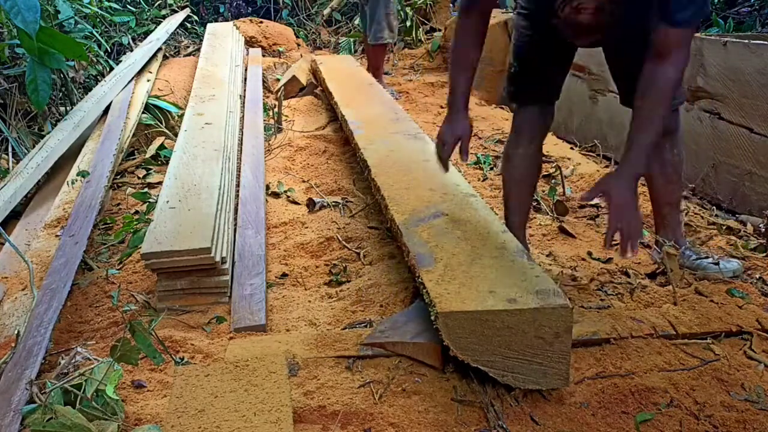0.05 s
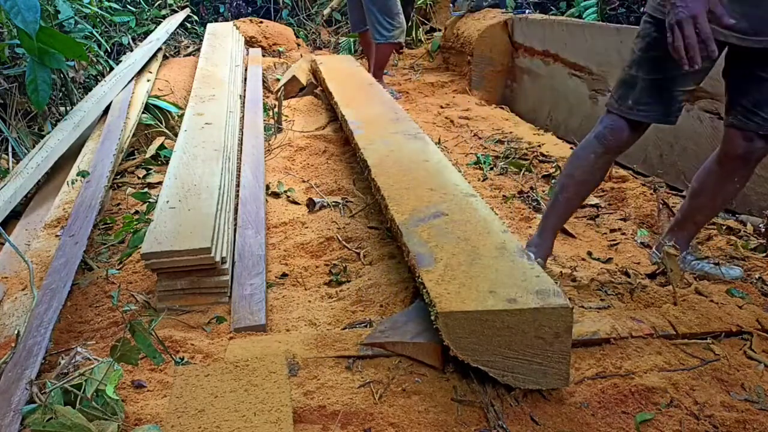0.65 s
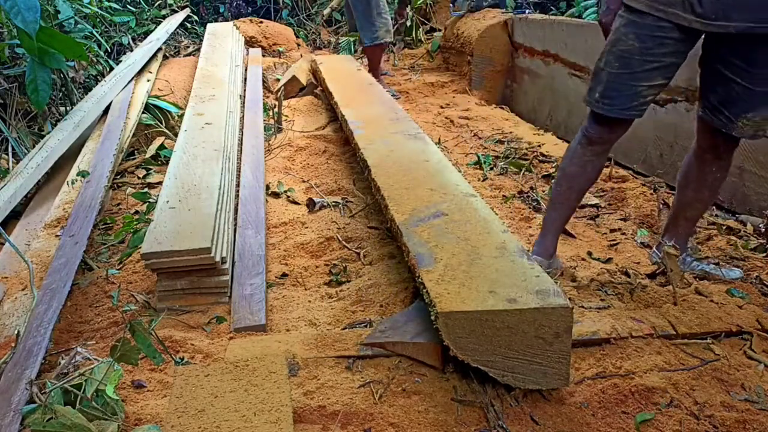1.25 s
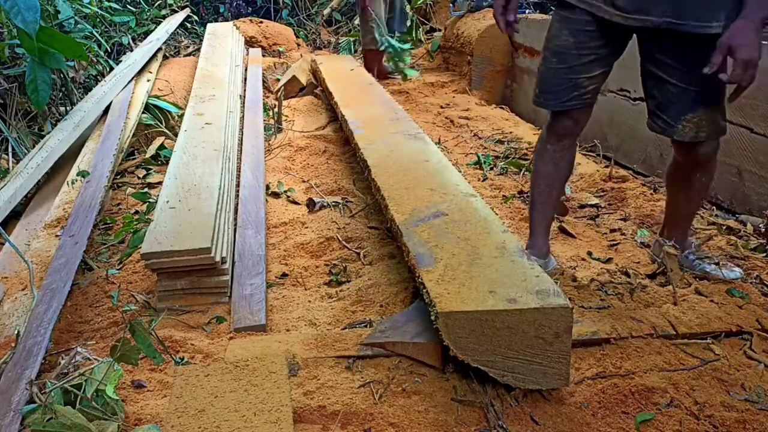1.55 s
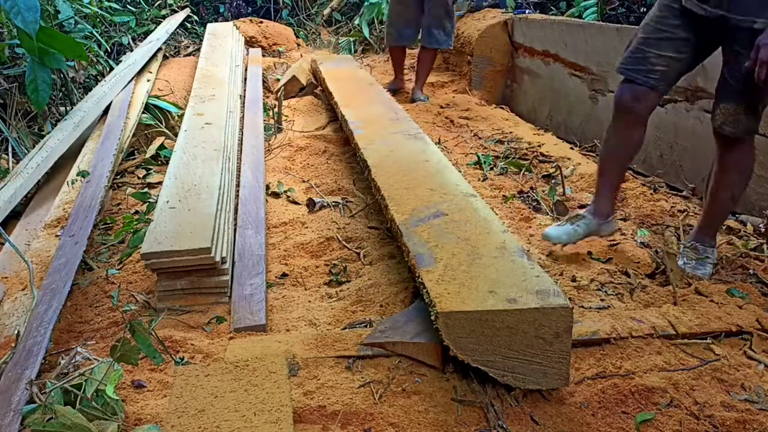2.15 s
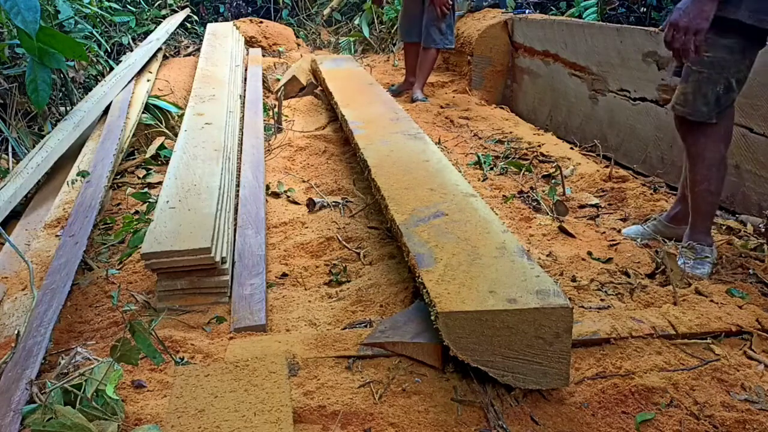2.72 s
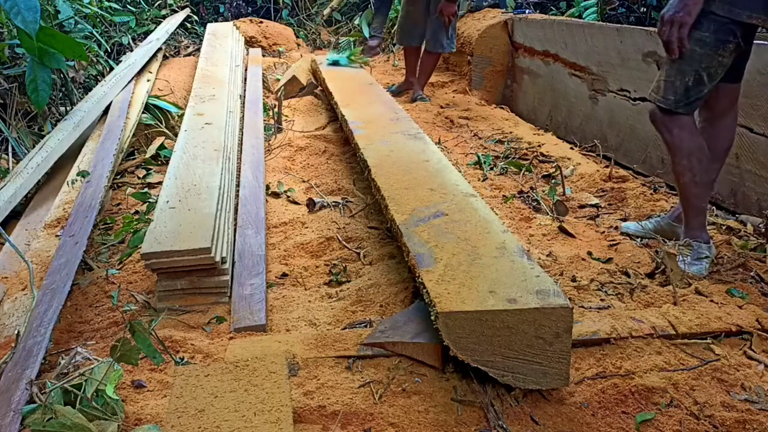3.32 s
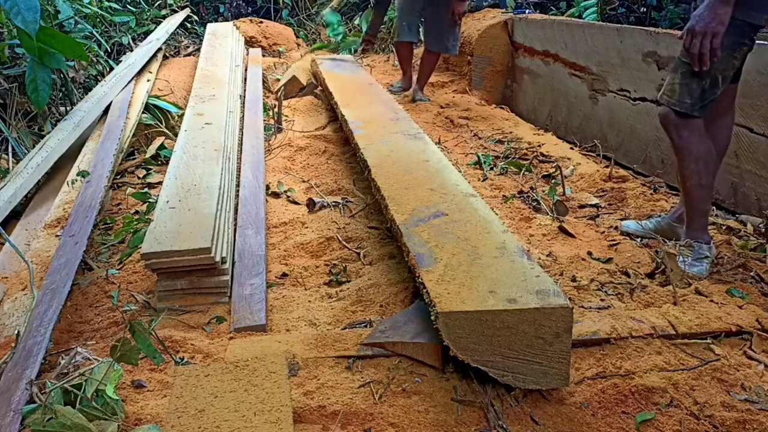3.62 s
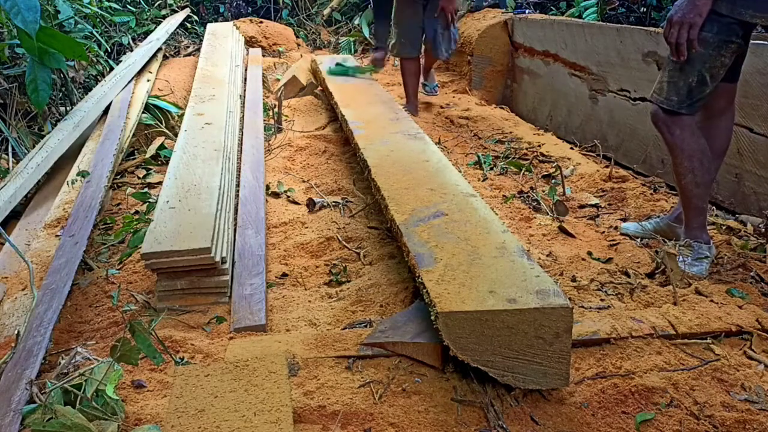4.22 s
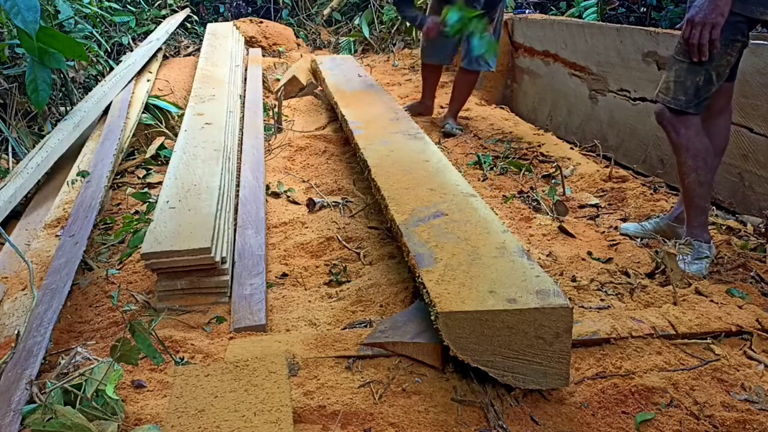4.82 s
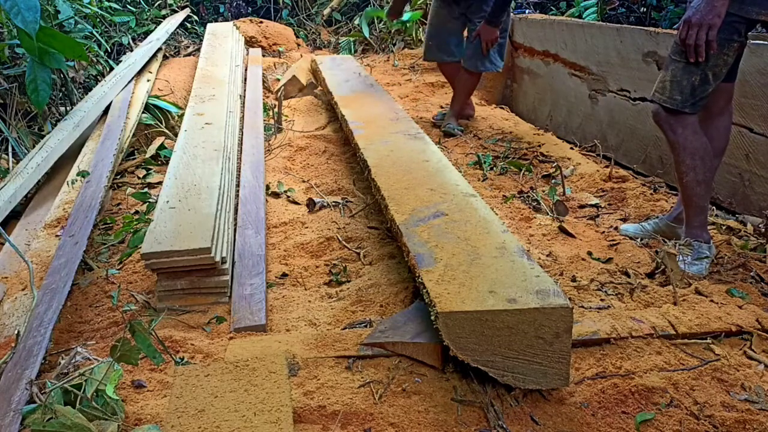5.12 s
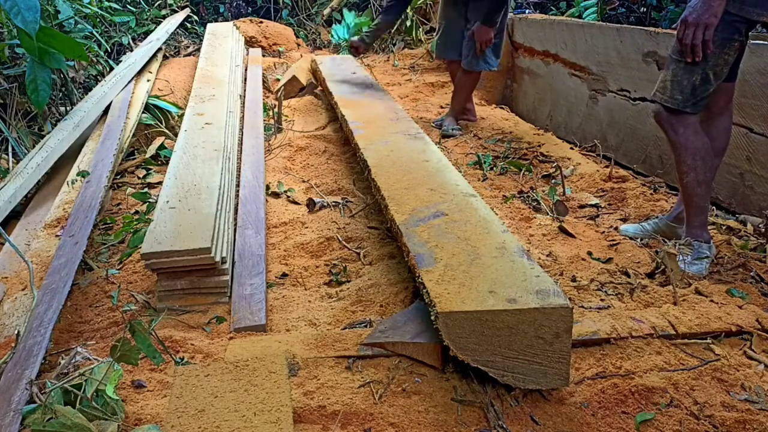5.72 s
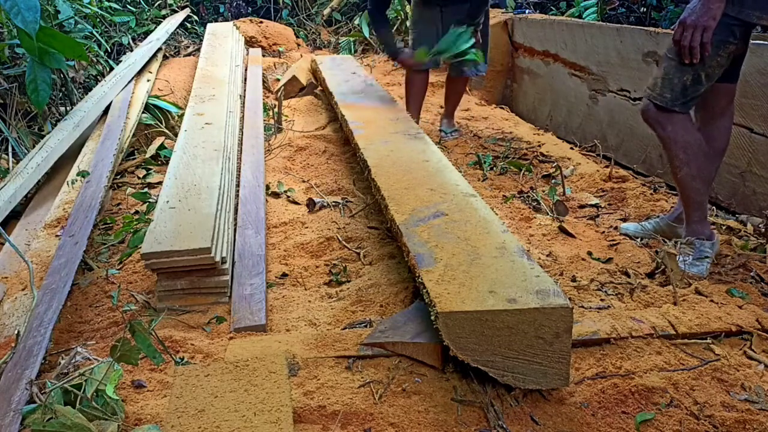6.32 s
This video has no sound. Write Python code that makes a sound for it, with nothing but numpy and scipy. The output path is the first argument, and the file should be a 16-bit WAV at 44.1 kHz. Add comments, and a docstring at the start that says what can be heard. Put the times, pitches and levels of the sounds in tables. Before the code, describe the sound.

A leafy branch swishes and slaps sawdust off a timber beam in quick strokes, with insects hissing in the forest behind.

```python
"""Insects hiss and buzz and small birds whistle in a forest clearing; feet shuffle, wood knocks softly.
From about 2 s a leafy branch whisks sawdust off a sawn beam, about four strokes a second.
Each stroke swishes in, slaps the timber with a dull pat of squeezed air and drags its leaves across.
Stiff leaves and twigs tick; the trees scatter a short tail."""
import sys
import numpy as np
from scipy import signal
from scipy.fft import rfft, irfft, next_fast_len
from scipy.io import wavfile
from scipy.ndimage import map_coordinates

SR = 44100
rng = np.random.default_rng(int(sys.argv[2]) if len(sys.argv) > 2 else 0)


def master_out(mix):
    """Clip the mix to full scale and print it as 16-bit PCM to the path in sys.argv[1]."""
    frames = np.transpose(np.atleast_2d(mix))
    ceiling = np.clip(frames, -1, 1)
    pcm = np.round(ceiling * 32767).astype(np.int16)
    wavfile.write(sys.argv[1], SR, pcm)


N = 289296


def amp(db):
    """Decibels to gain."""
    return 10 ** (np.asarray(db) / 20)


def unit(x):
    """Scale to rms 1."""
    return x / np.sqrt(np.mean(x ** 2) + 1e-20)


def along(points, hz):
    """Interpolate (Hz, value) points on a log frequency axis."""
    point_hz, values = np.transpose(points)
    return np.interp(np.log(hz + 1), np.log(point_hz + 1), values)


def clock(samples=N):
    """Sample times in seconds."""
    return np.arange(samples) / SR


def wobble(knots_per_s):
    """A smooth random curve."""
    knots = rng.standard_normal(int(N * knots_per_s / SR) + 4)
    return map_coordinates(knots, [np.arange(N) * knots_per_s / SR], order=2)


def filtered(x, response):
    """Apply a complex frequency response."""
    size = next_fast_len(N + SR // 4)
    return irfft(rfft(x, size) * response(np.fft.rfftfreq(size, 1 / SR)), size)[..., :N]


def add(track, start_s, sound):
    """Mix a sound into a track."""
    start = max(round(start_s * SR), 0)
    part = track[..., start:start + sound.shape[-1]]
    part += sound[..., :part.shape[-1]]


# Near and far sound at the two microphone ports. Each row: frequency in Hz, coherence 0-1.
NEAR_COHERENCE = [(60, 1), (250, 0.94), (1200, 1), (2200, 0.71), (3500, 0.48), (8000, 0.59), (15000, 0.25)]
FAR_COHERENCE = [(60, 0.25), (300, 0.19), (1300, 0.19), (3000, 0.1), (6000, 0.012)]
def mid_side(coherence, hz):
    """Mid and side gains that give this coherence between the ports."""
    angle = np.arccos(np.clip(along(coherence, hz), -1, 1)) / 2
    return np.array([np.cos(angle), np.sin(angle)])


def noise(spectrum, coherence, grain=1):
    """Stereo noise of rms 1 from (Hz, dB) points; a fast gain breaks it into grains."""
    white = rng.standard_normal((2, N)) * grain
    mid, side = filtered(white, lambda hz: amp(along(spectrum, hz)) * mid_side(coherence, hz))
    return unit(np.array([mid + side, mid - side]))


def contacts(spread_db):
    """Uneven sizes of tiny leaf contacts, each under a millisecond, bunched leaf by leaf."""
    sizes = .8 * wobble(2500) + .6 * wobble(400)
    return amp(spread_db * np.clip(sizes, -2, 2))


def flex(x, depth_db):
    """Leaves bend as they slide, so their resonances come and go."""
    bins = signal.stft(x, nperseg=512)[2]
    patch = np.outer(np.hanning(8), np.hanning(9))
    field = signal.fftconvolve(rng.standard_normal(bins.shape[1:]), patch, "same")
    gain = unit(amp(depth_db * np.clip(unit(field), -2, 2)))
    return signal.istft(bins * gain, nperseg=512)[1][..., :N]


# Each row: frequency in Hz, relative density in dB.
AIR_SPECTRUM = [(20, -24), (55, -47), (80, -23), (115, -3), (170, -2.5), (250, -3.5), (400, -7),
                (650, -10.5), (1000, -15.5), (2000, -19.5), (3000, -20.5), (5000, -56)]
INSECT_SPECTRUM = [(2000, -23.5), (3400, -9.5), (4400, -2.5), (5200, -3), (6100, -10.5), (7400, -15),
                   (8300, -4.5), (8900, 1.5), (9400, -5), (10200, 3), (10700, -6), (11300, -2.5),
                   (13000, -11.5), (15400, -8)]
def forest(air_db, insect_db):
    """A low hush of air under a steady chorus of insects."""
    air = amp(air_db + 0.85 * wobble(4.65)) * noise(AIR_SPECTRUM, FAR_COHERENCE)
    insects = amp(insect_db + 0.15 * wobble(2.8)) * noise(INSECT_SPECTRUM, FAR_COHERENCE)
    return air + insects


# Each row: start in seconds, length in seconds.
INSECT_BUZZES = [(-.1, 0.17), (.963, 0.45), (2.618, 0.32)]
# Each row: start in seconds, length in seconds, first pitch in Hz, last pitch in Hz, relative dB.
BIRD_WHISTLES = [(0.715, 0.067, 9030, 9430, -59), (0.774, 0.1, 10980, 9550, -58),
                 (0.948, .25, 3560, 4050, -66.5), (1.144, 0.13, 3950, 4710, -64.5),
                 (4.049, 0.11, 3870, 3765, -64), (4.213, .24, 5100, 5270, -61)]
def insects_and_birds(gain_db, waver_hz, whistle_depth, buzz_depth, buzz_hz, buzz_db):
    """High, one-note insect buzzes and thin bird glides; the pitch wavers fast, distance blurs them."""
    t, song = clock(), np.zeros(N)
    waver = np.sin(2 * np.pi * waver_hz * t) + .5 * wobble(600)
    glides = [(*row, whistle_depth) for row in BIRD_WHISTLES]
    buzzes = [(*row, buzz_hz, buzz_hz, buzz_db, buzz_depth) for row in INSECT_BUZZES]
    for start_s, length_s, first_hz, last_hz, db, depth in glides + buzzes:
        on = (t > start_s) & (t < start_s + length_s)
        progress = (t[on] - start_s) / length_s
        pitch_hz = (first_hz + (last_hz - first_hz) * progress) * (1 + depth * waver[on])
        envelope = amp(db + gain_db) * np.sqrt(np.abs(np.sin(np.pi * progress)))
        song[on] += envelope * np.sin(2 * np.pi * np.cumsum(pitch_hz) / SR)
    return .5 * song + trees(np.array([song, song]))


# Each row: frequency in Hz, time to fall 60 dB in seconds.
TREE_T60 = [(150, 0.17), (600, 0.24), (2000, 0.37), (5000, 0.42), (14000, 0.32)]
def trees(x):
    """Trunks and foliage scatter a short tail; a new one each half second, as the source moves."""
    out, block = np.zeros((2, N)), SR // 2
    for start in range(0, N, block):
        hz, t, bins = signal.stft(rng.standard_normal((2, block)), SR, nperseg=256)
        hz = hz[:, None]
        envelope = amp(-60 * t / along(TREE_T60, hz)) * (1 - np.exp(-t / .004))
        mid, side = signal.istft(bins * mid_side(FAR_COHERENCE, hz) * envelope, SR, nperseg=256)[1]
        tail = np.array([mid + side, mid - side])
        tail /= np.linalg.norm(tail[0])
        add(out, start / SR, signal.fftconvolve(x[:, start:start + block], tail, axes=1))
    return out


# Each row: start in seconds, length in seconds, relative level in dB.
SHOE_SCUFFS = [(0.302, 0.036, -64), (0.323, 0.54, -69), (0.764, 0.22, -66.5), (0.855, .022, -63),
               (1.396, .13, -69), (1.75, 0.16, -68)]
def feet(gain_db):
    """Each scuff of a shoe swells and fades in sawdust and dry leaves."""
    t = clock()
    rub = sum(amp(db + gain_db) * np.sin(np.pi * np.clip((t - start_s) / length_s, 0, 1))
              for start_s, length_s, db in SHOE_SCUFFS)
    spectrum = [(150, -20), (400, -4), (1400, 0), (2800, 1), (6000, -5.5), (15000, -11)]
    crunch = noise(spectrum, FAR_COHERENCE, contacts(spread_db=3))
    return rub * flex(crunch, depth_db=3)


# Each row: start in seconds, relative level in dB.
TIMBER_KNOCKS = [(.317, -47.5), (.863, -46), (.871, -47.5), (1.7935, -32), (2.175, -33.5), (3.706, -34.5),
                 (4.145, -33.5)]
# Each row: resonance in Hz, bandwidth in Hz, gain in dB.
TIMBER_MODES = [(340, 80, -4.5), (486, 230, -3.5), (750, 410, -8.5), (1350, 200, -14), (3300, 1500, -48)]
def knocks(gain_db):
    """Soft blows into heavily damped wood."""
    def timber(hz):
        return sum((-1) ** k * amp(db) * 1j * hz * width_hz / (mode_hz**2 - hz**2 + 1j * hz * width_hz)
                   for k, (mode_hz, width_hz, db) in enumerate(TIMBER_MODES))

    blows = np.zeros(N)
    for start_s, db in TIMBER_KNOCKS:
        add(blows, start_s, amp([db + gain_db]))
    return filtered(blows, timber)


# Each row: start in seconds, relative peak in dB, brightness from 0 (twig) to 1 (leaf).
LEAF_FLICKS = [(.569, -51, 0), (.889, -45, 0.4), (1.79, -42, 0.7), (2.148, -34, .8), (2.975, -25, 0.67),
               (3.178, -38.5, 0.27), (3.493, -26.5, 0.99), (3.944, -28, 0.84), (4.655, -29, .3),
               (5.145, -33, .7), (5.167, -22, 0.9), (5.948, -28, 0.83)]
def flicks(gain_db, t60_s, crack_db, crack_loss_db_per_s, crack_brightness, strays_per_s, stray_db):
    """Stiff leaves tick brightly, twigs click duller: singly, and as each stroke lands."""
    t = clock(SR // 10)
    twig, leaf = np.zeros((2, N))
    # The flatter the landing, the shorter the rise and the louder the first leaf cracks.
    cracks = [(start_s, stroke_db(slap_db, drag_db) + crack_db - crack_loss_db_per_s * rise_s,
               crack_brightness) for start_s, slap_db, rise_s, drag_db, _ in BRANCH_STROKES]
    # The shaken branch also ticks faintly at random.
    wait, loudness, tone = rng.random((40, 3)).T
    stray_s = BRANCH_STROKES[0][0] + np.cumsum(-np.log(wait)) / strays_per_s
    strays = zip(stray_s, stray_db + (2 * loudness - 1), tone)
    for start_s, db, brightness in [*LEAF_FLICKS, *cracks, *strays]:
        force = amp(db + gain_db - 60 * t / t60_s)
        add(leaf, start_s, force * np.sqrt(brightness))
        add(twig, start_s, force * np.sqrt(1 - brightness))
    grain = contacts(spread_db=2)
    leaf_spectrum = [(600, -22), (2500, -6), (6000, -2.5), (15000, -4.5)]
    twig_spectrum = [(200, -20.5), (900, -3.5), (1600, -3), (2300, -8.5), (3400, 5.5),
                     (5000, -10.5), (10000, -23)]
    return (leaf * noise(leaf_spectrum, NEAR_COHERENCE, grain)
            + twig * noise(twig_spectrum, NEAR_COHERENCE, grain))


# Each row: time in seconds, flutter in dB before centring and scaling.
BRANCH_SHAKE = [(2.0, -73), (3.33, -69.5), (3.65, -64), (3.96, -73), (4.07, -67.5), (4.64, -71.5),
                (4.74, -67.5), (5.68, -77.5), (6.56, -62)]
# Each row: frequency in Hz, relative density in dB.
SWISH_SPECTRUM = [(150, -39), (500, -9), (1100, -3.5), (1800, -4), (3000, -3.5), (4500, -3), (7000, -5),
                  (15000, -6.5)]
def swing(swish_db, swell_s, flutter_db, shake_scale):
    """Leaves flutter in the air and swish louder as the branch speeds toward the beam."""
    t, rush = clock(SR // 4), np.zeros(N)
    for landing_s, *_ in BRANCH_STROKES:
        add(rush, landing_s - t[-1], amp(swish_db) * np.exp((t - t[-1]) / swell_s))
    shake_s, shake_db = np.transpose(BRANCH_SHAKE)
    contour_db = shake_scale * np.interp(clock(), shake_s, shake_db - shake_db.mean())
    flutter = amp(flutter_db + contour_db + 4.5 * wobble(25)) * (clock() > shake_s[0])
    leaves = flex(noise(SWISH_SPECTRUM, NEAR_COHERENCE, contacts(spread_db=3)), depth_db=3)
    return (rush + flutter) * leaves


def stroke_db(slap_db, drag_db):
    """Strength of a whole stroke: power sum of slap and drag."""
    return 20 * np.log10(np.hypot(amp(slap_db), amp(drag_db)))


# Each row: start in seconds, slap in relative dB, rise in seconds, drag in relative dB, drag in seconds.
BRANCH_STROKES = [(2.17, -27.5, 0.0092, -30, 0.018), (2.429, -31, 0.0068, -33, 0.024),
                  (2.729, -25.5, 0.0055, -39.5, 0.035), (2.979, -46, 0.0011, -34, 0.025),
                  (3.235, -27.5, .01, -39, 0.055), (3.444, -36.5, .01, -41.5, 0.056),
                  (3.701, -27, .011, -39, 0.047), (3.896, -56, 0.0068, -44.5, 0.071),
                  (4.137, -25, .012, -42.5, 0.066), (4.352, -39, 0.0023, -37.5, 0.046),
                  (4.63, -21, 0.006, -32, 0.022), (4.878, -26, 0.0075, -36.5, 0.048),
                  (5.156, -34, 0.0097, -36, 0.03), (5.408, -43, 0.012, -34, 0.052),
                  (5.7212, -23, 0.0033, -30.5, 0.0092), (5.93, -33.5, 0.0012, -31, .011),
                  (6.123, -22.5, 0.0085, -42.5, 0.041), (6.311, -22.5, 0.0064, -40, 0.0069),
                  (6.492, -21.5, 0.007, -45, 0.013)]
# Each row: frequency in Hz, relative density in dB.
SCRAPE_SPECTRUM = [(900, -58), (1800, -10), (2600, -15), (3500, 1), (5000, 1.5), (6300, -1.5), (8000, -1),
                   (9800, 3), (10900, 0), (13000, 1), (15500, -1)]
BLADE_SPECTRUM = [(300, -46), (550, -15), (800, -3), (1200, 1.5), (1600, -0.5), (2200, 4.5), (3200, 7),
                  (6000, -52)]
PAT_SPECTRUM = [(25, -30), (60, -29), (85, -34), (120, -4.5), (165, 2), (260, -1), (380, -1), (600, -16),
                (1200, -20.5)]
def sweep(slap_t60_s, drag_t60_s, pat_t60_s, drag_fade_db, scrape_db, blade_db, pat_db, usual_db):
    """Leaves pile onto the beam in a few milliseconds, then scrape across it and lift off."""
    scrape, blade, pat = np.zeros((3, N))
    t = clock(SR // 4)
    for start_s, slap_db, rise_s, drag_db, drag_s in BRANCH_STROKES:
        landing_db = slap_db - 16 * np.maximum(1 - t / rise_s, 0)
        slap = amp(landing_db - 60 * np.maximum(t - rise_s, 0) / slap_t60_s)
        sliding_db = drag_db - drag_fade_db * np.minimum(t / drag_s, 1)
        drag = amp(sliding_db - 60 * np.maximum(t - drag_s, 0) / drag_t60_s)
        force = np.hypot(slap, drag * (1 - np.exp(-t / .0022)))
        # Harder strokes are brighter: blade and pat grow less than the scrape.
        extra_db = stroke_db(slap_db, drag_db) - usual_db
        add(scrape, start_s, force * amp(scrape_db))
        add(blade, start_s, force * amp(blade_db - 0.11 * extra_db))
        # Air squeezed out under the leaves gives a soft, low pat.
        pat_tail = 0.38 * force.max() * amp(-60 * t / pat_t60_s)
        squeeze = np.hypot(force, pat_tail) * (1 - np.exp(-t / 0.00085))
        add(pat, start_s, squeeze * amp(pat_db - 0.33 * extra_db))
    grain = contacts(spread_db=2.8)
    flaps = amp(3 * wobble(110))  # broad blades flop down one after another
    return (scrape * flex(noise(SCRAPE_SPECTRUM, NEAR_COHERENCE, grain), depth_db=2.3)
            + blade * flex(noise(BLADE_SPECTRUM, NEAR_COHERENCE, grain * flaps), depth_db=3)
            + pat * noise(PAT_SPECTRUM, NEAR_COHERENCE))


# Each row: start in seconds, pitch in Hz, relative level in dB.
HEAVY_THUMPS = [(2.173, 208, -35.5), (2.732, 175, -44), (3.704, 292, -40), (4.142, 277, -36.5),
                (4.636, 210, -46), (5.724, 300, -42.5)]
def thumps(gain_db, swell_s, settle_hz, settle_db, settle_db_per_drag_s):
    """Air trapped under cupped leaves pulses: in heavy landings, and softly as each stroke settles."""
    t, out = clock(SR // 8), np.zeros(N)
    pulse = (t / swell_s) ** 2 * np.exp(2 - 2 * t / swell_s)
    pitches_hz = settle_hz * np.exp(.08 * rng.standard_normal(len(BRANCH_STROKES)))
    # Longer drags settle later and press down harder.
    settles = [(start_s + .03 + 0.328 * drag_s, hz, settle_db + settle_db_per_drag_s * drag_s)
               for (start_s, *_, drag_s), hz in zip(BRANCH_STROKES, pitches_hz)]
    for start_s, hz, db in [*HEAVY_THUMPS, *settles]:
        add(out, start_s, amp(db + gain_db) * pulse * np.sin(2 * np.pi * hz * t))
    return out


def scene():
    """The branch works a little left of centre, so its sound reaches the left port first."""
    near = sweep(slap_t60_s=0.049, drag_t60_s=0.14, pat_t60_s=0.25, drag_fade_db=2,
                 scrape_db=0.29, blade_db=-11.5, pat_db=-22.5, usual_db=-30.5)
    near += thumps(gain_db=-5, swell_s=0.0058, settle_hz=170, settle_db=-56, settle_db_per_drag_s=110)
    near += swing(swish_db=-55, swell_s=0.029, flutter_db=-66, shake_scale=1.44)
    near += flicks(gain_db=-7.5, t60_s=0.035, crack_db=9.5, crack_loss_db_per_s=1300,
                   crack_brightness=0.83, strays_per_s=3, stray_db=-46)
    near += knocks(gain_db=33)
    left_lead_s = 1.13 / SR
    direct = filtered(near, lambda hz: np.exp(np.array([[1j], [-1j]]) * np.pi * hz * left_lead_s))
    mix = direct + amp(-11.5) * trees(near) + feet(gain_db=3)
    mix += insects_and_birds(gain_db=3, waver_hz=59.6, whistle_depth=.012,
                             buzz_depth=0.0195, buzz_hz=8370, buzz_db=-65.5)
    return mix + forest(air_db=-69, insect_db=-61.5)


# Each row: frequency in Hz, right port over left in dB.
PORT_BALANCE = [(100, -1.5), (700, -.5), (2000, 0.2), (7500, 1.5), (9500, 6), (11500, 7.5), (13000, 8),
                (14500, -2), (15500, -2)]
BAND_LIMIT_HZ = 15550
def record(dry):
    """The right microphone port is brighter than the left; nothing passes above the band limit."""
    def response(hz):
        ports = amp(np.array([[-.5], [.5]]) * along(PORT_BALANCE, hz))
        return ports / np.sqrt(np.mean(ports ** 2, axis=0)) * (hz < BAND_LIMIT_HZ)

    return filtered(dry, response)


dry = scene()
out = record(dry)
master_out(out)
```